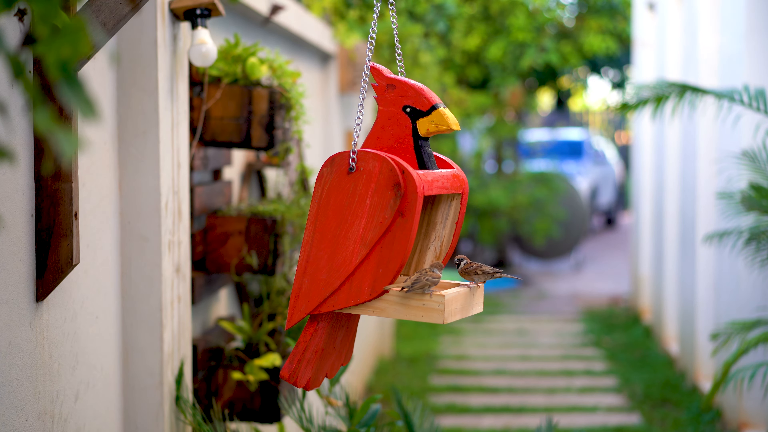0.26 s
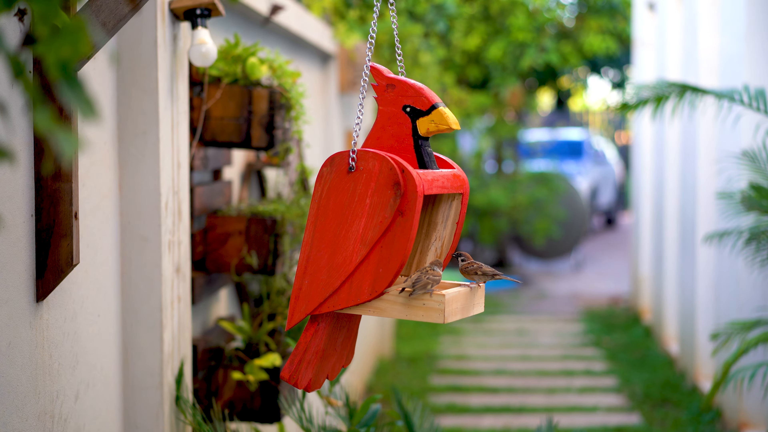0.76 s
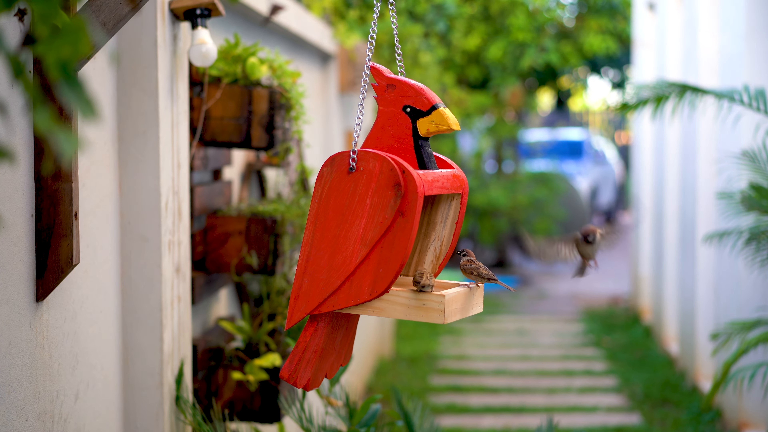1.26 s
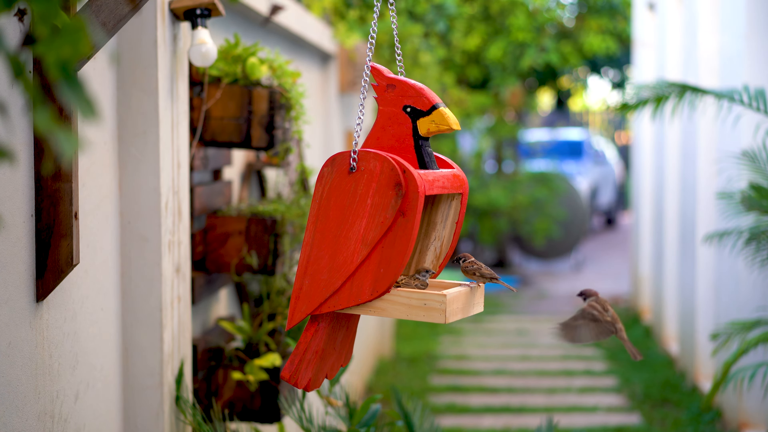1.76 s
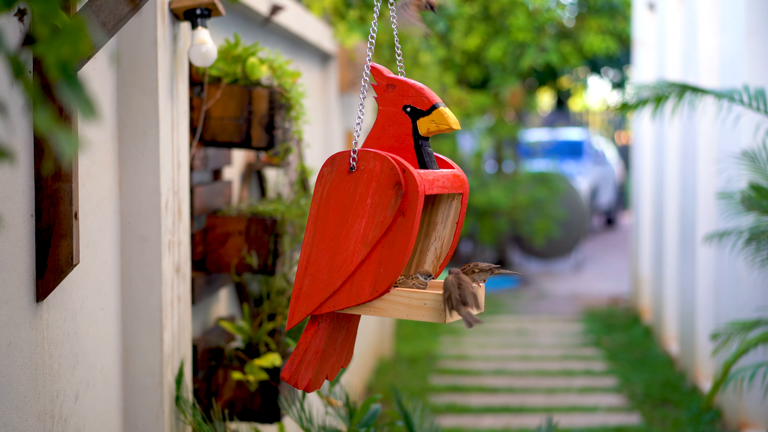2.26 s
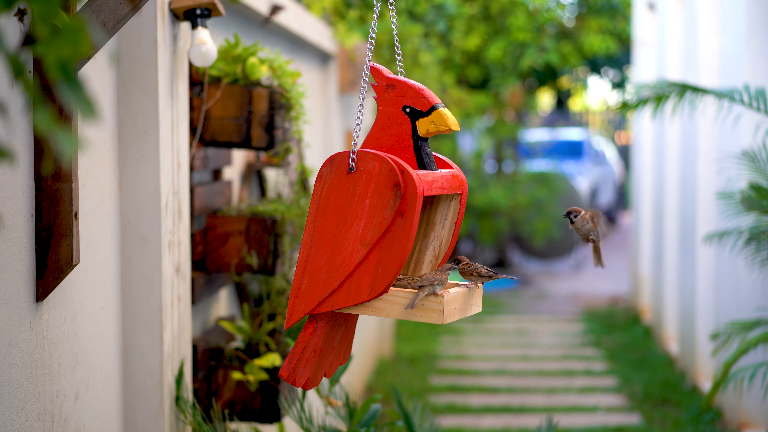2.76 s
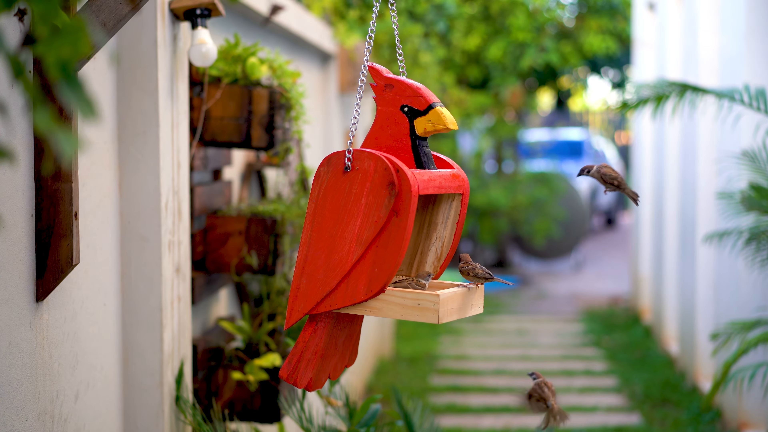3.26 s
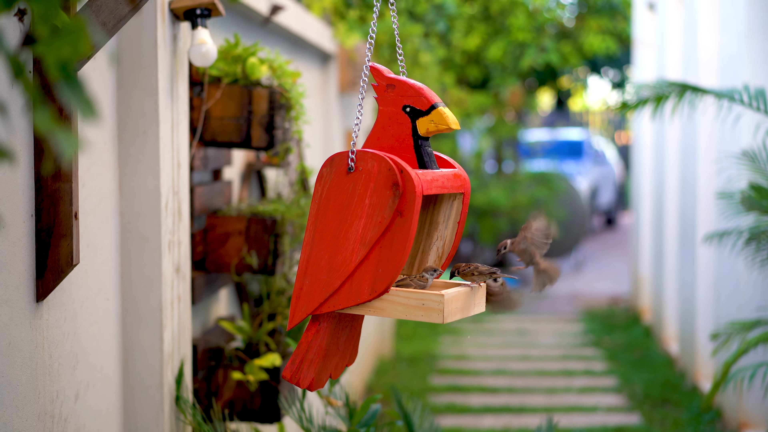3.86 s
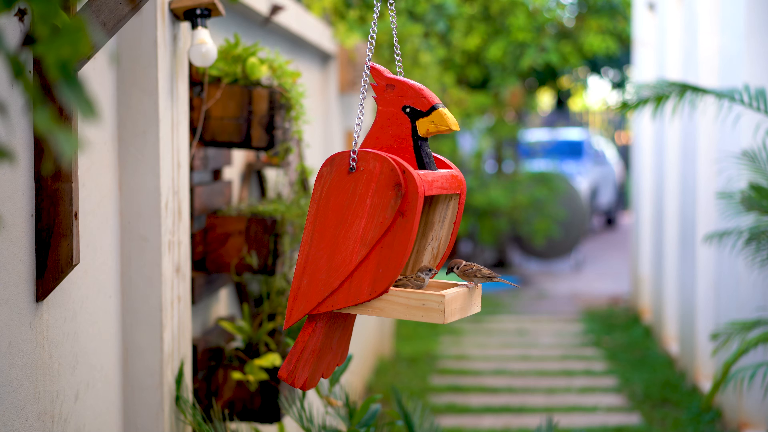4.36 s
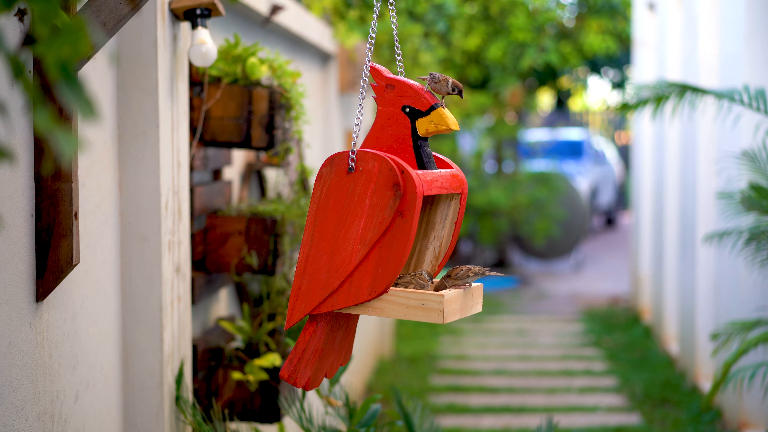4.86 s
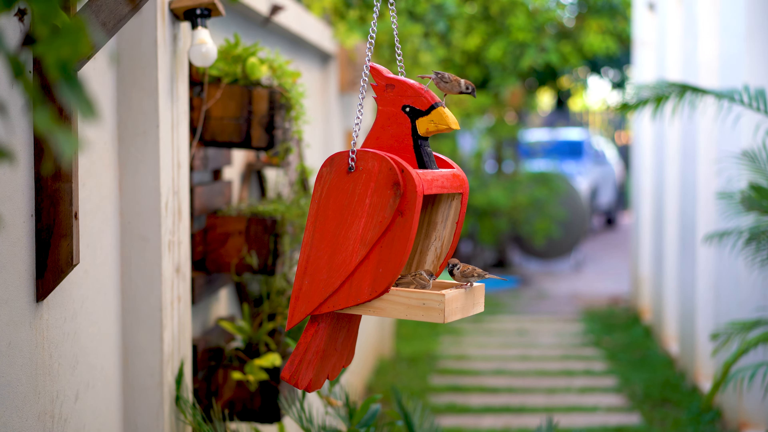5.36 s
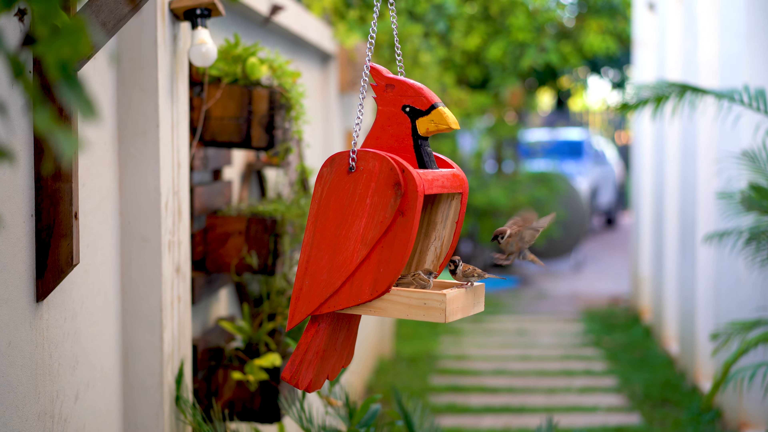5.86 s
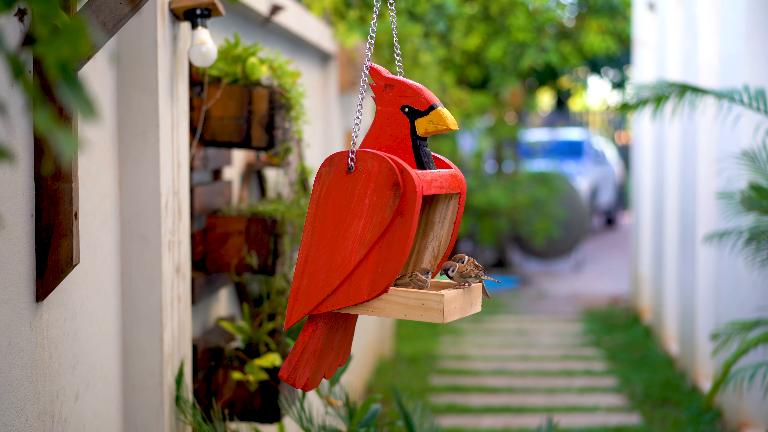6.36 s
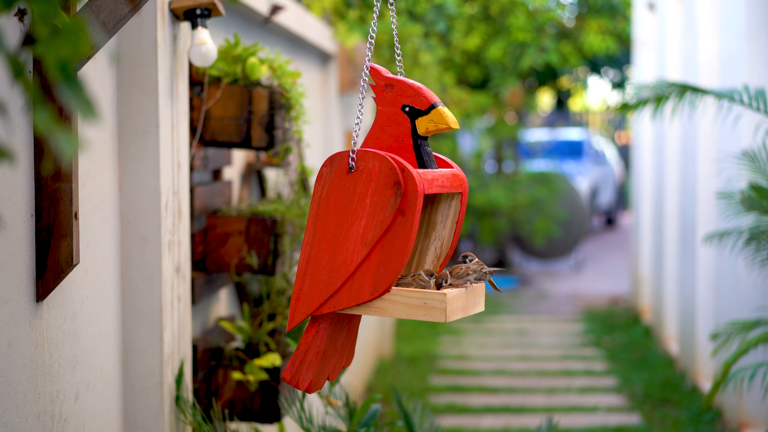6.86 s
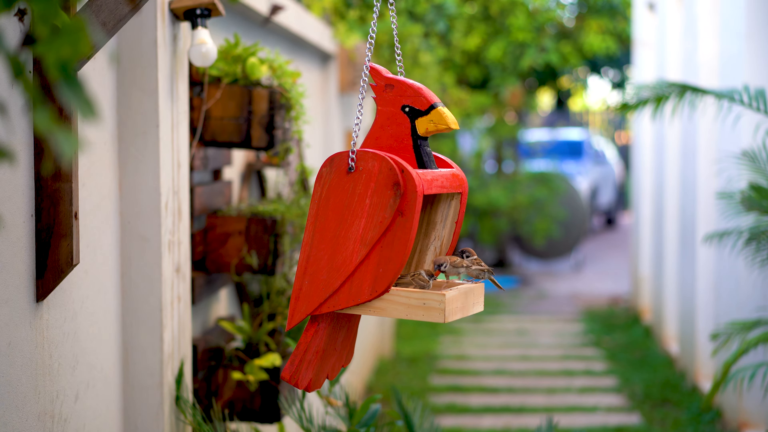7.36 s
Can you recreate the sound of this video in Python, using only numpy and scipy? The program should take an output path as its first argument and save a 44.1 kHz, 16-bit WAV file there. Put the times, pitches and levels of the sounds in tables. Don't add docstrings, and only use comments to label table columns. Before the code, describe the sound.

Outdoor stereo pickup beside a hanging wooden feeder between walls. Crisp, slightly raspy sparrow chirps repeat singly with clear gaps, faint reverberant chirps falling between them. Small claw clicks and dry scrapes cluster before the middle; high insect bursts fade out. After a sudden cut, chirps come louder, throbbing insects return, and soft round whoops rise in the distance, then a wing flutter and far rooster notes over breeze and town hum.

```python
import sys
import numpy as np
from scipy import signal
from scipy.io import wavfile
from scipy.ndimage import uniform_filter1d

SR = 44100
rng = np.random.default_rng(int(sys.argv[2]) if len(sys.argv) > 2 else 0)


def materialize(psi):
    bounded = np.clip(np.atleast_2d(psi).T, -1, 1)
    quanta = np.round(bounded * 32767).astype(np.int16)
    wavfile.write(sys.argv[1], SR, quanta)


def gain_from_decibels(decibels):
    exponent = np.asarray(decibels, float) / 20
    return 10 ** exponent


N = 335160
CUT_S = 4.495

# start_s, level_db, pitch_factor, length_factor, upper_voice_db
SPARROW_CHIRPS = [
    (0.062, -25.5, 1.017, 0.92, 0.5),
    (.823, -25, 1.025, 0.9, -0.1),
    (1.901, -25.5, 1.007, 0.84, 0.6),
    (2.815, -25, 1.02, 0.88, -1.7),
    (4.301, -23, 1.03, 0.81, -1.5),
    (4.599, -21.5, 0.99, 0.93, -7.5),
    (5.392, -21, .97, .88, -5),
    (6.127, -20.5, 1.006, 0.87, -7),
    (6.931, -20.5, 0.97, 0.89, -4.5),
]
# time_s, pitch_hz, level_db
LOWER_VOICE = [(.01, 3500, -50), (.019, 3620, -26), (.024, 3800, -1), (.032, 4250, 7.5), (.04, 4550, 7),
               (.05, 4160, 6.5), (.062, 3500, 3.5), (.074, 2950, -3), (.085, 2680, -19), (.096, 2400, -40)]
LOWER_VOICE_AFTER = [(.016, 4850, -44), (.025, 4670, -3), (.03, 4550, 2), (.04, 4410, 2.5), (.05, 3985, 0),
                     (.062, 3398, -0.5), (.074, 2817, -9), (.086, 2415, -19), (.096, 2300, -40)]
# time_s, pitch_hz, level_db
UPPER_VOICE = [(-.01, 2460, -38), (-.002, 2470, -25), (.008, 2480, -10.5), (.02, 2545, -6.5),
               (.027, 2703, -6.5), (.036, 2686, -9.5), (.05, 2740, -11), (.066, 2660, -29)]
UPPER_VOICE_AFTER = [(-.01, 2500, -36), (0, 2477, -19), (.02, 2475, -5.5), (.027, 2493, -10),
                     (.034, 2822, -11), (.05, 2830, -13.5), (.068, 2800, -18)]
# multiple, level_db
LOWER_HARMONICS = [(1, 1), (2, -16.5), (3, -11.5)]
UPPER_HARMONICS = [(1, -12.5), (2, 10), (3, 2.5), (4, 6), (5, 6)]
# frequency_hz, gain_db
BEAK_GAIN = [(2300, -5.5), (2900, -8), (3500, 1), (4300, 3), (5600, 4), (7700, -0.5), (8700, -12.5),
             (11000, -14), (13200, -9.5), (15500, -8)]
# frequency_hz, t60_s
PASSAGE_DECAY = [(500, 0.64), (1500, 0.39), (2500, 0.5), (4500, 0.4), (8000, 0.39), (15000, 0.25)]

# start_s, level_db, length_s, end_pitch_hz
FAR_SLURS = [(0.316, -43, 0.091, 2833), (0.702, -46.5, 0.05, 2754), (1.157, -43, 0.11, 3720),
             (1.496, -41, 0.09, 3190), (2.075, -45, 0.09, 2990), (2.637, -44, 0.14, 2893),
             (3.182, -44, 0.13, 2905), (3.496, -49, 0.22, 3980), (3.805, -45, 0.12, 2895),
             (4.528, -45.5, 0.074, 2420), (4.922, -43, 0.047, 2754), (5.044, -44.5, 0.028, 2720),
             (5.223, -46.5, 0.066, 2750), (5.324, -42, 0.095, 3250), (5.89, -47, 0.069, 3310),
             (6.327, -40, 0.048, 5130), (6.363, -41, 0.087, 3120), (6.668, -51, 0.021, 2840),
             (7.165, -45, 0.038, 3340), (7.257, -45, 0.044, 3410)]

# start_s, length_s, top_pitch_hz, loudest_db, scoop_s
WHOOP_NOTES = [
    (4.299, 0.32, 1084, -40, 0.028),
    (4.746, 0.13, 1082, -33, 0.026),
    (5.055, 0.15, 1071, -35, 0.044),
    (5.396, 0.16, 1118, -33.5, 0.079),
    (5.767, 0.045, 994, -43.5, 0.035),
    (5.821, 0.11, 1105, -31, 0.055),
]
# multiple, level_db
WHOOP_HARMONICS = [(1, 6), (2, -20), (3, -17)]

# start_s, length_s, start_pitch_hz, end_pitch_hz, level_db
DULL_NOTES = [(1.63, 0.16, 1205, 1274, -52), (1.991, 0.15, 714.4, 710, -49.5),
              (2.143, 0.13, 704, 724, -50.5), (2.24, 0.094, 824, 840, -49), (2.295, 0.11, 704, 704, -56),
              (2.4, 0.25, 840, 830, -61.5), (2.698, 0.15, 614, 662, -55), (2.872, 0.13, 749, 733, -53.5),
              (3.029, 0.12, 721, 708, -54), (3.129, 0.067, 745, 723, -62), (3.233, 0.096, 715, 717, -57),
              (6.136, 0.33, 922, 864, -56.5), (6.47, 0.76, 886, 871, -62.5), (6.229, 0.1, 946, 1028, -48)]
EVEN_NOTES = [
    (6.505, 0.184, 1036, 1029, -41.5),
    (6.69, 0.16, 1020, 1006, -44),
    (6.87, 0.242, 1011, 988, -45.5),
]
CLEAR_NOTES = [
    (1.2, 0.27, 852, 843, -71),
    (1.683, 0.17, 814, 781, -62),
    (1.981, 0.13, 647, 733, -60),
    (2.1, 0.16, 694.5, 678, -60),
    (2.249, 0.15, 832, 860, -62),
    (4.302, 0.063, 973, 962, -55.5),
    (6.221, 0.188, 884, 873, -61),
]
SHRILL_NOTES = [
    (6.17, 0.22, 751, 721, -58),
    (6.23, 0.27, 877, 883, -58.5),
    (6.65, 0.41, 727.5, 720, -54.5),
    (6.8, 0.65, 749, 738.5, -53.5),
    (7.096, 0.267, 710, 696, -53),
    (7.4, 0.42, 724, 734.6, -62),
]
# frequency_hz, gain_db
ROOSTER_THROAT = [(300, -36), (800, -1), (1300, 11.5), (2000, -7.5), (3000, -5.5), (5000, -64)]

# start_s, peak_db, body_re_tick_db, left_right_db
CLAW_TICKS = [
    (1.5197, -39, 2, -6.5),
    (3.0004, -19, -20, -7),
    (3.3314, -39, -19, -3),
    (3.9278, -24.5, -2, -5),
    (3.971, -32.5, -7, -20),
    (4.1061, -43.5, -11, -10),
    (4.2, -42, -2, -5),
    (4.3152, -38, 8.5, -3),
    (5.17, -60, 13, -11),
    (5.6362, -41, -6, -2.5),
]
# start_s, length_s, level_db, top_frequency_hz
WOOD_SCUFFS = [
    (1.066, 0.056, -55, 3500),
    (2.24, 0.29, -44, 3500),
    (2.999, 0.038, -48, 8930),
    (3.435, 0.16, -48, 2520),
    (3.908, 0.017, -40, 9000),
    (3.924, 0.07, -39, 6000),
    (4, 0.065, -39, 3300),
    (4.155, 0.091, -47.5, 1190),
    (5.237, 0.032, -51, 3550),
]

# centre_hz, width_hz, level_db, left_right_db
INSECT_CHORUS = [
    (5226, 670, -50.5, 0.5),
    (6545, 600, -47, -2.5),
    (10185, 1460, -48.5, -4.5),
]
# time_s, level_db
THROB_LEVEL = [(0, -45.5), (1.4, -45.5), (1.6, -52), (2.7, -57), (3.4, -68), (4.48, -73.5), (4.51, -47),
               (7.6, -49)]
# from_s, phase_turns, rate_per_s, neighbour_phase_turns, neighbour_rate_per_s
THROB_PACE = [
    (4.5, .27, 8.38, .28, 7.62),
    (6.1, .39, 8.38, -.29, 7.4),
]
# start_s, length_s, level_db
BUZZ_BURSTS = [
    (-.1, 0.36, -48.5),
    (0.462, 0.46, -49.5),
    (1.267, 0.33, -48.5),
    (2.118, 0.29, -49),
    (2.768, 0.31, -50),
]

# frequency_hz, density_db_per_hz
RUMBLE_SPECTRUM = [(12, -63), (20, -35), (43, -26), (91, -0.5), (130, 1), (184, 1), (277, -4), (300, 5),
                   (390, 1.5), (660, -120)]
WASH_SPECTRUM = [(88, -62), (150, -26), (222, -23), (346, -12), (516, 10), (763, 2), (825, 4.5),
                 (1200, -29), (1560, -48), (2640, -120)]
LEAVES_SPECTRUM = [(600, -17), (900, 3.5), (1500, 1.5), (2500, -0.5), (3300, 3.5), (4500, 7), (5800, -1),
                   (7500, -1.5), (9000, -55)]
RUSTLE_SPECTRUM = [(3000, -20), (5000, -87), (8000, 14.5), (12000, 6), (14000, 11), (16000, 4)]
# frequency_hz, likeness
COHERENCE = [(30, 0.87), (100, 1), (250, 0.99), (500, 0.78), (1000, 0.36), (1700, 0.14), (3500, -0.51),
             (6000, 0.23)]
# time_s, above_usual_db
TRAFFIC_LEVEL = [(0, 1), (1.07, 0), (1.41, 6), (2.1, 1), (2.6, 4), (3.41, 7), (3.7, 4.5), (4.25, 7),
                 (4.48, 0.5), (4.52, 0.7), (6.2, 1.8), (7.6, -0.5)]
BREEZE_LEVEL = [(0, -1.5), (.29, -4.5), (1.18, -2), (1.3, 2.5), (1.41, 3), (1.6, 2), (2.1, 1), (2.5, 3),
                (3.41, 4), (3.69, 0.5), (4.08, 3.5), (4.48, -0.5), (4.52, -1), (5.23, -1.5), (6.1, -0.5),
                (6.4, 5), (7.6, 1)]
# pitch_hz, level_db, start_s, end_s
MACHINE_HUM = [
    (99.5, -71, 2.0848, 7.6),
    (687, -61, 4.5, 9.1),
    (842, -71, 0.54, 4.3),
]


def evened(x):
    return x / np.sqrt(np.mean(x ** 2) + 1e-20)


def read(points, hz):
    f, value = np.transpose(points)
    return np.interp(np.log(hz + 1), np.log(f + 1), value)


def along(points, t):
    s, *columns = np.transpose(points)
    return [np.interp(t, s, c) for c in columns]


def sides(pan_db):
    return np.array([[pan_db], [-pan_db]]) / 2


def add(mix, s, sound, pan_db=0):
    part = mix[:, max(round(s * SR), 0):][:, :len(sound)]
    part += sound[:part.shape[1]] * gain_from_decibels(sides(pan_db))


def wobble(size, hz):
    settle = 999
    noise = rng.standard_normal(size + settle)
    return evened(signal.lfilter(*signal.butter(2, hz, fs=SR), noise)[settle:])


def voice(hz, level_db, tones, rough, rough_hz, tract=((1, 0),)):
    hz = hz * (1 + rough * wobble(len(hz), rough_hz))
    turns = np.cumsum(hz) / SR
    stack = sum(gain_from_decibels(db + read(tract, k * hz)) * np.sin(2 * np.pi * k * turns) for k, db in tones)
    shake = 1 + 4 * rough * wobble(len(hz), rough_hz)
    return np.sqrt(2) * gain_from_decibels(level_db) * stack * shake


def space(x, wet_db, early_db, stretch, lag):
    size, gap, cut = 32000, 12, round(CUT_S * SR)
    taps = np.zeros((2, size))
    at = np.arange(100, size - gap, gap) + rng.integers(0, gap, (2, (size - 101) // gap))
    np.put_along_axis(taps, at, rng.choice([-1., 1.], at.shape), 1)
    hz, t, z = signal.stft(taps, SR, nperseg=256)
    decay = gain_from_decibels(-60 * t / (stretch * read(PASSAGE_DECAY, hz)[:, None]))
    tail = signal.istft(z * decay, SR, nperseg=256)[1][:, :size]
    walls_t60_s = 0.087 * stretch
    walls = taps * gain_from_decibels(-60 * np.arange(size) / SR / walls_t60_s)
    ring = gain_from_decibels(wet_db) * tail / np.linalg.norm(tail[0])
    ring = ring + gain_from_decibels(early_db) * walls / np.linalg.norm(walls[0])
    ring[[0, 1], [max(lag, 0), max(-lag, 0)]] = 1
    ring /= np.linalg.norm(ring, axis=1, keepdims=True)
    scenes = (x[:, :cut], x[:, cut:])
    return np.hstack([signal.oaconvolve(part, ring, axes=1)[:, :part.shape[1]] for part in scenes])


def sparrow():
    whistle_db, rasp_db = -0.5, -2.5
    out = np.zeros((2, N))
    for s, level_db, pitch, length, upper_db in SPARROW_CHIRPS:
        early = s < CUT_S
        t = np.arange(-.01, .097, 1 / SR / length)
        low_hz, low_db = along(LOWER_VOICE if early else LOWER_VOICE_AFTER, t)
        up_hz, up_db = along(UPPER_VOICE if early else UPPER_VOICE_AFTER, t)
        up_db = up_db + upper_db
        flutter = 1 + np.clip(14 * t, 0, .6) * np.sin(2 * np.pi * (290 * t + rng.random()))
        slur = flutter * voice(pitch * low_hz, low_db, LOWER_HARMONICS, .02, 600, BEAK_GAIN)
        rasp = voice(pitch * up_hz, up_db + rasp_db, UPPER_HARMONICS, .075, 600, BEAK_GAIN)
        whistle = voice(2 * pitch * up_hz, up_db + whistle_db, [(1, 0)], .012, 300, BEAK_GAIN)
        chirp = gain_from_decibels(level_db) * (slur + rasp + whistle) * signal.windows.tukey(len(t), .1)
        add(out, s - .01, chirp, 0 if early else -0.9)
    return space(out, -3, -1, 1.1, lag=-6)


def flock():
    out = np.zeros((2, N))
    for s, level_db, length, end_hz in FAR_SLURS:
        start_hz = 5190 if s < CUT_S else 4700
        hz = np.geomspace(start_hz, end_hz, round(length * SR))
        slur = voice(hz, level_db, [(1, 0)], .062, 450)
        add(out, s, slur * signal.windows.tukey(len(hz), .3), 1)
    return space(out, 7, 3.7, 1.8, lag=6)


def whooper():
    low_hz, drop_s, drop = 975, 0.035, .85
    waver_per_s, waver_from_hz, waver_span_hz = 31, 1085, 55
    echo_s, echo_db = .066, -13
    out = np.zeros((2, N))
    for s, length, top_hz, level_db, scoop in WHOOP_NOTES:
        t = np.arange(0, length, 1 / SR)
        fall = 1 - drop + drop * (length - t) / drop_s
        lift = np.sin(np.pi / 2 * np.clip(np.minimum(t / scoop, fall), 0, 1))
        swell_db = np.interp(t / length, [0, 0.75, 1], [-8, 0, -5])
        hz = low_hz + (top_hz - low_hz) * lift
        depth = np.clip((top_hz - waver_from_hz) / waver_span_hz, 0, 1)
        waver = 1 + depth * np.sin(2 * np.pi * waver_per_s * t)
        note = waver * voice(hz, level_db + swell_db, WHOOP_HARMONICS, 0.0092, 32)
        add(out, s, note * signal.windows.tukey(len(hz), .3), -2.6)
    out = out + gain_from_decibels(echo_db) * np.roll(out[::-1], round(echo_s * SR), axis=1)
    after = np.arange(N) >= CUT_S * SR
    return space(out * after, -7, -15, 1.45, lag=2)


def roosters():
    out = np.zeros((2, N))
    birds = ((0.71, DULL_NOTES), (1.244, EVEN_NOTES), (1.3, CLEAR_NOTES), (1.95, SHRILL_NOTES))
    for bright, notes in birds:
        for s, length, start_hz, end_hz, level_db in notes:
            hz = np.linspace(start_hz, end_hz, round(length * SR))
            tones = [(k, read(ROOSTER_THROAT, k * start_hz / bright)) for k in range(1, 6)]
            breath_db = level_db + 3.32 * wobble(len(hz), 43.0) - np.linspace(-1.2, 1.2, len(hz))
            note = voice(hz, breath_db, tones, .012 * bright, 62.0)
            add(out, s, note * signal.windows.tukey(len(hz), .1), -1.5 if s > 2.1 else 1.5)
    return space(out, -1.5, -6, 1.1, lag=-2)


def feeder():
    out, t = np.zeros((2, N)), np.arange(400) / SR
    for s, level_db, body_db, pan_db in CLAW_TICKS:
        tick = np.sin(2 * np.pi * 13500 * t) * np.exp(-t / 0.00026)
        burst = rng.standard_normal(len(t)) * np.exp(-t / 0.00064)
        knock = signal.lfilter(*signal.butter(2, 700, "high", fs=SR), burst)
        add(out, s, gain_from_decibels(level_db + 8.0) * (tick + gain_from_decibels(body_db + 3.0) * knock), pan_db)
    for s, length, level_db, top_hz in WOOD_SCUFFS:
        size = round(length * SR)
        grains = rng.standard_normal(size) * rng.exponential(1, size)
        grit = signal.lfilter(*signal.butter(1, [500, top_hz], "band", fs=SR), grains)
        add(out, s, gain_from_decibels(level_db) * evened(grit) * signal.windows.tukey(size, .7), -2)
    return space(out, -12, -9, .35, lag=5)


def band(drive, hz, width):
    turn = np.exp(2j * np.pi * np.cumsum(hz * np.ones(N)) / SR)
    r = np.exp(-1.5 * np.pi * width / SR)
    rung = signal.sosfilt([[1, 0, 0.002, 1, -2 * r, r * r]] * 2, drive / turn)
    return evened((turn * rung).real)


def sing(hz, width, level_db, per_s, depth, pan_db):
    stroke_turns = np.cumsum(per_s * (1 + 0.034 * wobble(N, 3.21))) / SR
    strokes = 1 + depth * np.cos(2 * np.pi * stroke_turns)
    ring = band(rng.standard_normal((2, N)), hz, width) * strokes
    drift_db = 1.1 * wobble(N, 1.9)
    return ring * gain_from_decibels(level_db + drift_db + sides(pan_db))


def insects():
    t, out = np.arange(N) / SR, np.zeros((2, N))
    for hz, width, level_db, pan_db in INSECT_CHORUS:
        out += sing(hz, width, level_db, 1, 0, pan_db)

    fall_db_per_s = 32 / 0.04
    bursts_db = []
    for s, length, db in BUZZ_BURSTS:
        outside_s = np.maximum(abs(t - s - length / 2) - length / 2, 0)
        bursts_db.append(db - fall_db_per_s * outside_s)
    out += sing(11300, 540, np.max(bursts_db, 0), 139, 0.2, -2.8)

    late = t > CUT_S
    early = .42 + 7.72 * t - .06 * t ** 2
    hitched = (t > THROB_PACE[-1][0]).astype(int)
    s, start, per_s, next_start, next_per_s = np.array(THROB_PACE)[hitched].T
    turn = 2 * np.pi * np.where(late, start + per_s * (t - s), early)
    level_db = along(THROB_LEVEL, t)[0]
    throb_hz = np.where(late, 8320 + 50 * np.sin(turn), 9000)
    out += sing(throb_hz, 420, level_db + 4.4 * np.cos(turn), np.where(late, 121, 125), .6, -3)
    next_turn = 2 * np.pi * (next_start + next_per_s * (t - s))
    out += late * sing(8830, 520, level_db - 2.5 + 4 * np.cos(next_turn), 130, 0.14, -3.03)
    return out


def air():
    frames, hz = N // 256 + 5, np.fft.rfftfreq(1024, 1 / SR)
    t = np.arange(frames) * 256 / SR
    traffic, breeze = along(TRAFFIC_LEVEL, t)[0], along(BREEZE_LEVEL, t)[0]
    take_off_s, take_off_length_s = 5.62, 0.46
    take_off = np.clip(np.minimum(t - take_off_s, take_off_s + take_off_length_s - t) / 0.045, 0, 1)
    rustle_db = -60 + 1.5 * breeze + 1.3 * rng.standard_normal(frames)
    rustle_db = rustle_db - 8.5 * (t > CUT_S) + 11.5 * take_off
    # spectrum, the band from and to (Hz) in which its level holds, level (dB)
    layers = ((RUMBLE_SPECTRUM, 60, 250, -69.5 + traffic),
              (WASH_SPECTRUM, 300, 600, -60 + 0.68 * traffic),
              (LEAVES_SPECTRUM, 1250, 1900, -58 + breeze),
              (RUSTLE_SPECTRUM, 12200, 15500, rustle_db))
    power = 0
    for spectrum, lo_hz, hi_hz, level_db in layers:
        shape = gain_from_decibels(read(spectrum, hz)) ** 2
        inside = (hz > lo_hz) & (hz < hi_hz)
        power = power + np.outer(shape / shape[inside].sum(), gain_from_decibels(level_db) ** 2)

    a, b, c, d, patches = rng.standard_normal((frames, 513, 5)).T
    patches = evened(uniform_filter1d(uniform_filter1d(patches, 10, 0), 14, 1))
    same = np.clip(read(COHERENCE, hz), -1, 1)[:, None]
    left = a + 1j * b
    right = same * left + np.sqrt(1 - same ** 2) * (c + 1j * d)
    z = np.array([left, right]) * np.sqrt(power) * gain_from_decibels(1.3 * patches)
    out = gain_from_decibels(1.0) * signal.istft(z, nperseg=1024, noverlap=768)[1][:, :N]

    for tone_hz, level_db, start, end in MACHINE_HUM:
        size = round((end - start) * SR)
        hum_db = level_db + 2.4 * wobble(size, 17.0)
        hum = voice(np.full(size, tone_hz), hum_db, [(1, 0)], 0.0084, 10.1)
        add(out, start, hum * signal.windows.tukey(size, .03))
    return out * gain_from_decibels([[-.3], [.3]])


def scene():
    return sparrow() + flock() + whooper() + roosters() + feeder() + insects() + air()


def band_limit(x):
    return signal.sosfilt(signal.butter(12, 16970, fs=SR, output="sos"), x)


def record(dry):
    dry = signal.lfilter(*signal.butter(2, 62, "high", fs=SR), dry)
    lowpass = signal.firwin(1023, 15800, window=("kaiser", 7), fs=SR)
    dry = signal.oaconvolve(dry, lowpass[None], "same")
    return band_limit(dry)


dry = scene()
out = record(dry)
materialize(out)
```